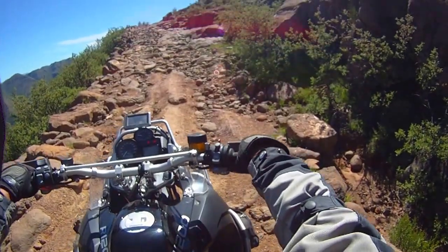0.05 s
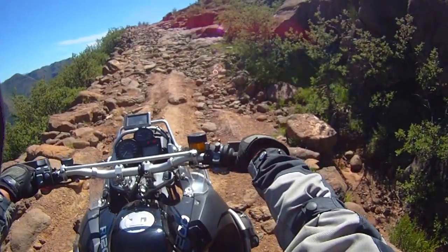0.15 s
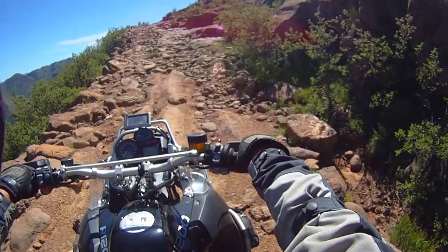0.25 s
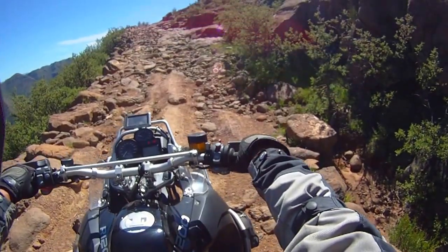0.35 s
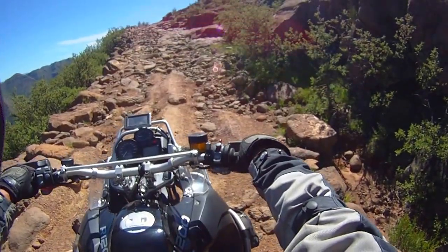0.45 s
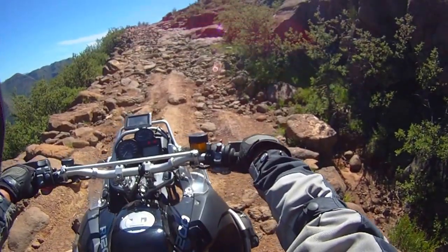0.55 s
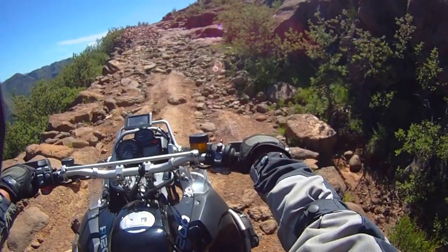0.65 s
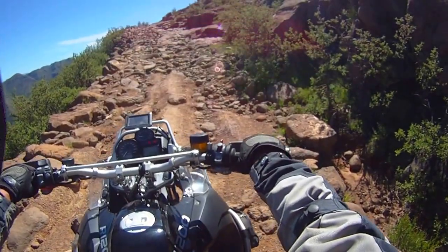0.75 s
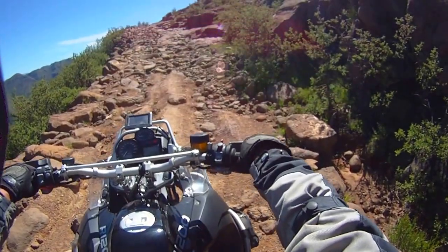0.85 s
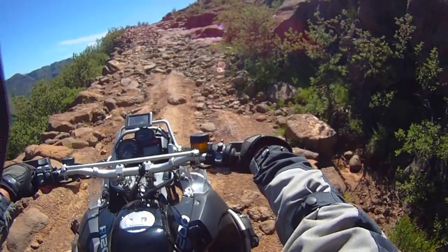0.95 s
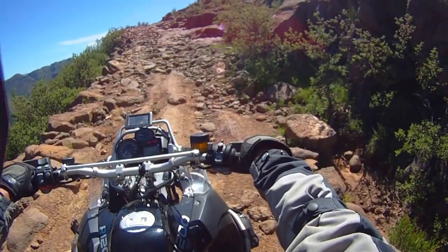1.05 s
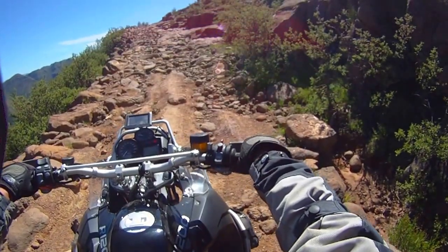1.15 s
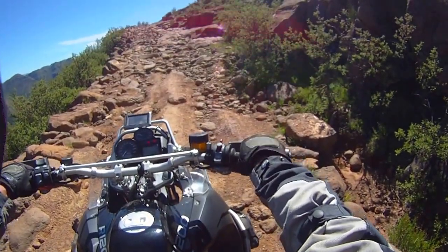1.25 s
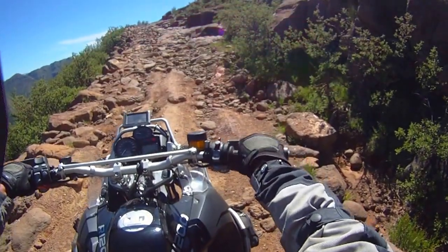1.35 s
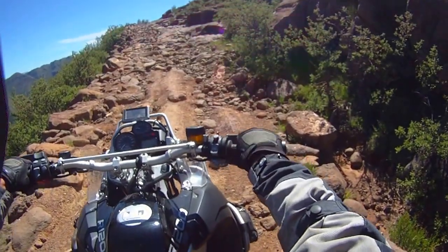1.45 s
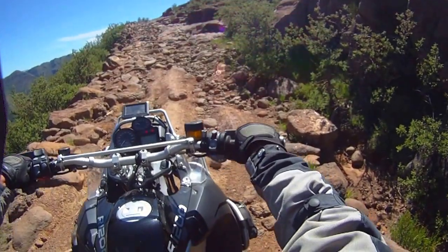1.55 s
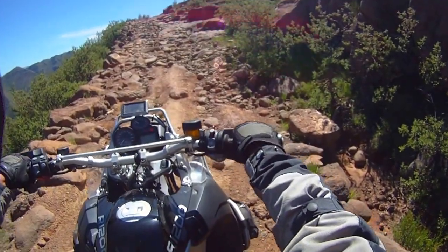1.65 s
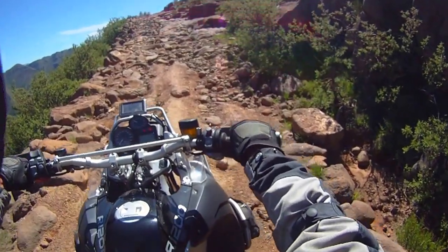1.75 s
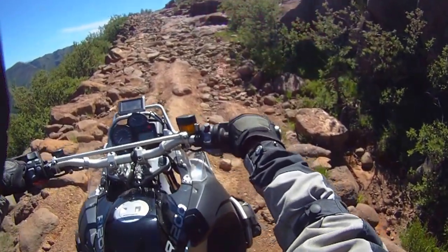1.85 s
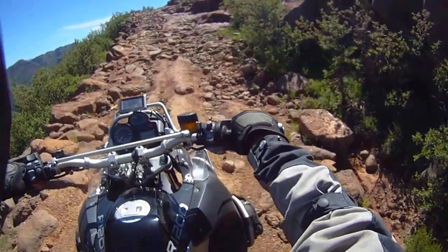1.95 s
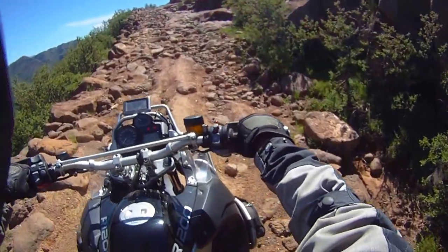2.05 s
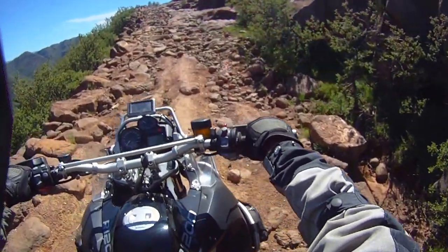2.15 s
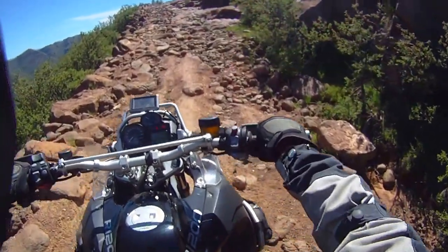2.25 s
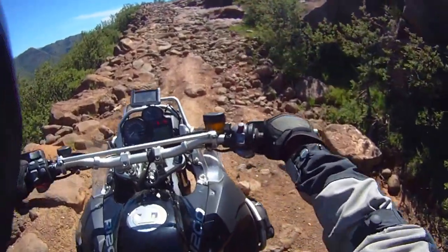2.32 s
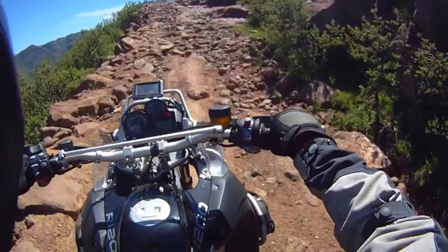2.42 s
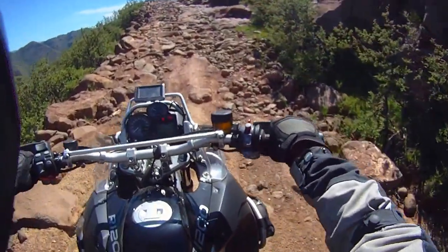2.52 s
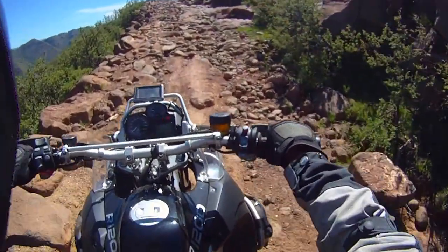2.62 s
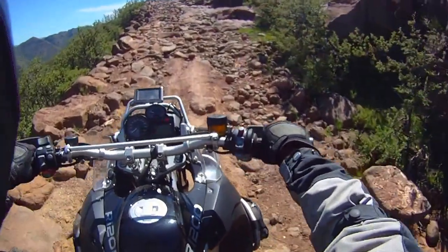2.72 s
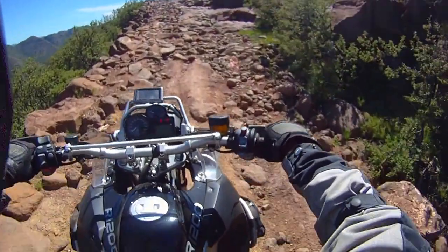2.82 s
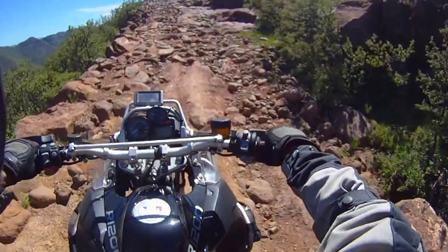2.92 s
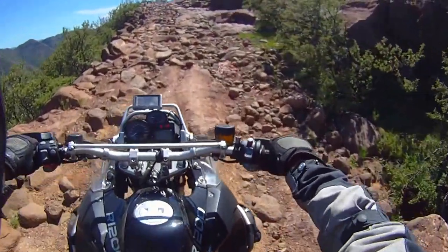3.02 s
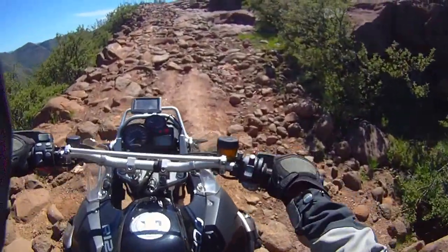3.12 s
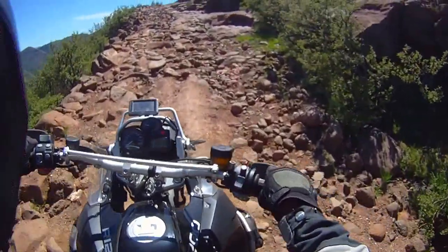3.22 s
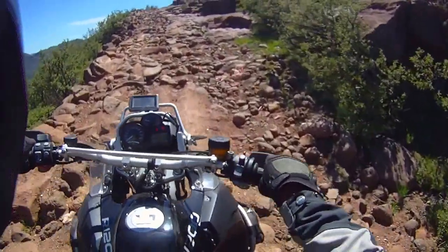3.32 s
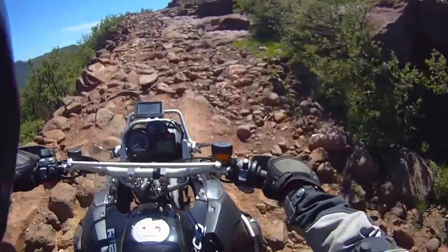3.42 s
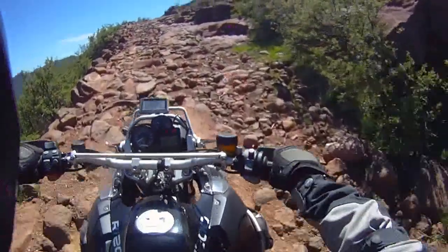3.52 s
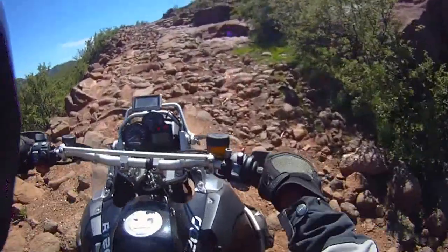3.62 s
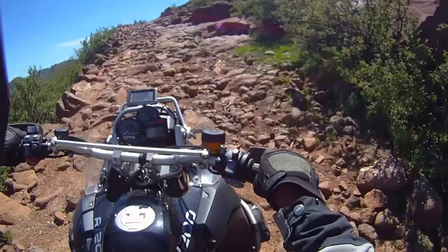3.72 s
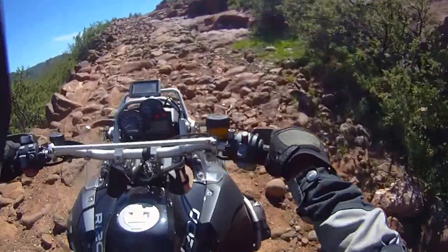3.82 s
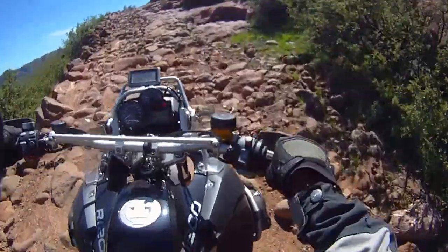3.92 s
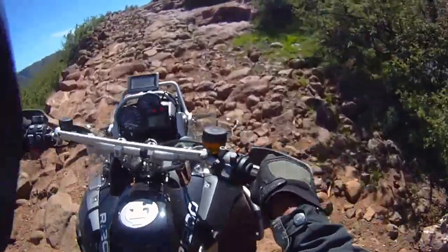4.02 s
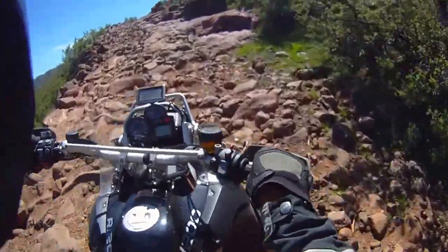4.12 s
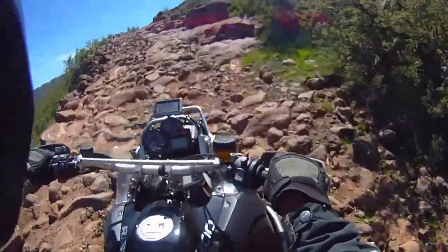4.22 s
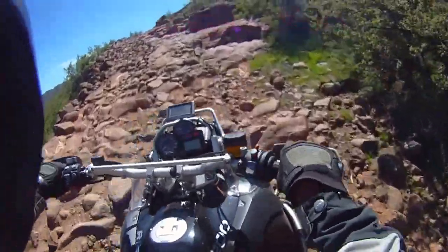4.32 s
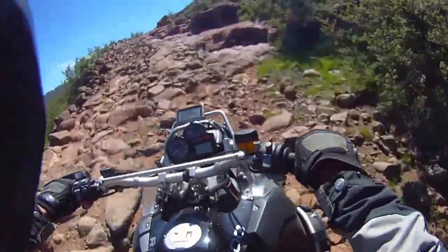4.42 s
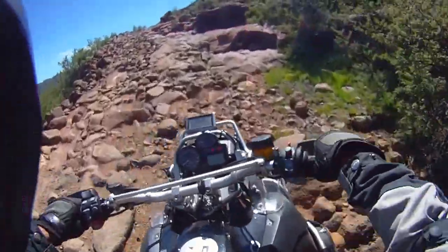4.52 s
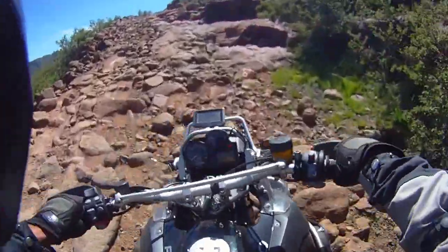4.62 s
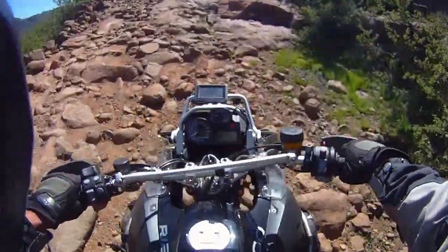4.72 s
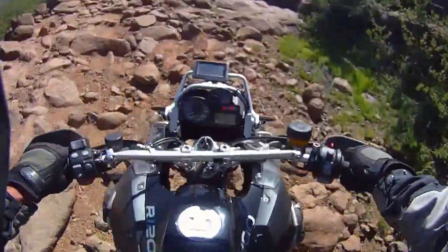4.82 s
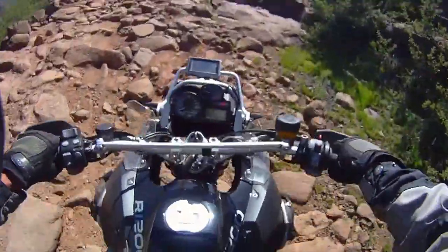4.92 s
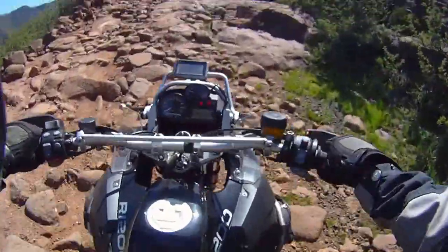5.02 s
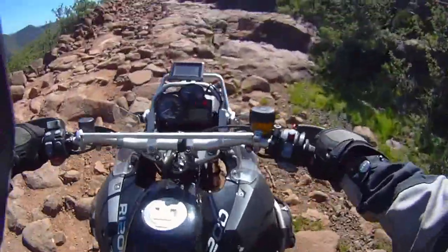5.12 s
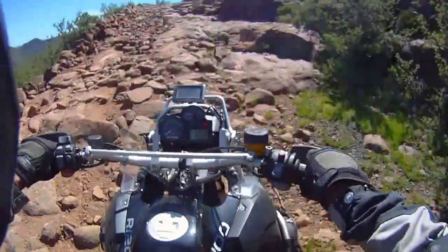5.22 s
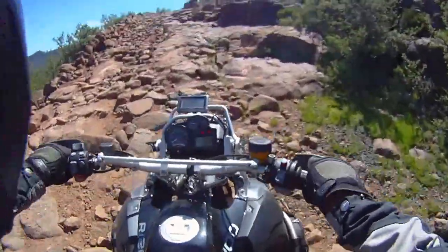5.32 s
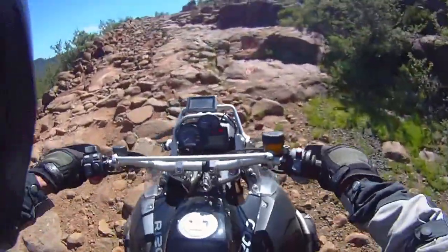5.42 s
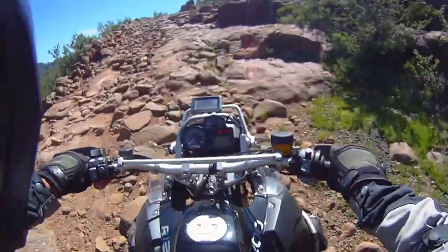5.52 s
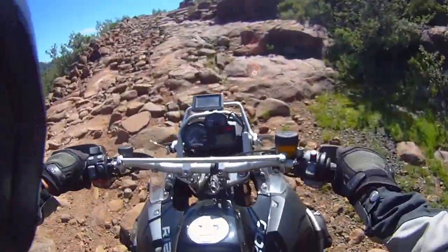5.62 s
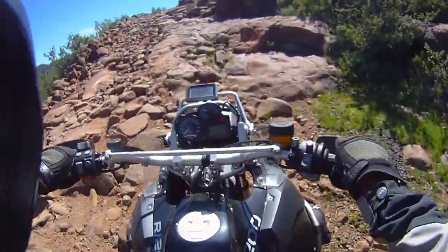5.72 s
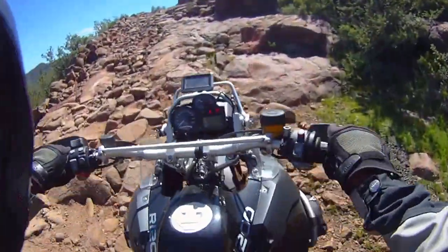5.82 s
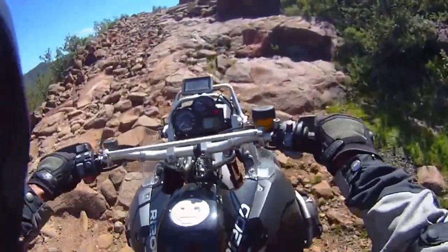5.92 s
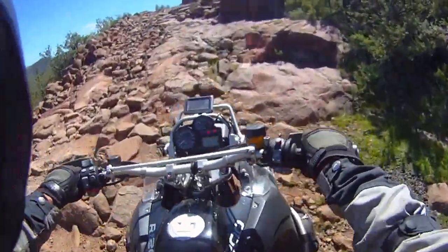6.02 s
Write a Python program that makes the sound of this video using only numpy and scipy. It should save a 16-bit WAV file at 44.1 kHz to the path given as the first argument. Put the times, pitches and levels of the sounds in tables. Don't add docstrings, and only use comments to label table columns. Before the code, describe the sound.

A twin-cylinder motorcycle climbs a rocky track, heard close and boxy through a sealed plastic case on the rider's helmet, in mono. At first the engine runs low with light throttle, sagging near 0.7 s, then giving a brief blip. From about 1.3 s it surges into a strong growling rev, held to about 2.3 s, then falls back. Shorter barks follow around 2.8, 3.2, 3.5 and 4.3 s, with valve clatter, hiss and gear whirr rising and falling alongside. A very faint thin brake squeak passes at 3.4 s. Small rattling jolts grow more frequent. At 4.6 s a lurch and sharp knock overload the input, followed by thuds and plastic chatter until about 4.8 s. The engine drops to lighter running, with more jolts near 5.05 s, then pulls again from 5.3 s, revving up, dipping and roaring loudest at the end near 6 s.

```python
import sys
import numpy as np
from scipy import signal
from scipy.fft import rfft, irfft, next_fast_len
from scipy.io import wavfile
from scipy.ndimage import uniform_filter1d, map_coordinates

SR = 44100
rng = np.random.default_rng(int(sys.argv[2]) if len(sys.argv) > 2 else 0)


def to_linear_factor(level_db):
    exponent = np.asarray(level_db, float) / 20
    return 10 ** exponent


def store_pcm(level_fs):
    pcm = np.round(np.clip(level_fs, -1, 1) * 32767).astype(np.int16)
    wavfile.write(sys.argv[1], SR, np.atleast_2d(pcm).T)


N = 267246

# time_s, firings_hz
FIRING_RATE = [(0.0, 29.11), (0.673, 19.2), (0.953, 37.74), (1.248, 29.85), (1.561, 51.33), (2.036, 51.69),
               (2.664, 24.39), (2.917, 38.9), (3.187, 25.88), (3.519, 32.02), (3.731, 24.28),
               (3.859, 28.28), (4.306, 22.29), (4.564, 37.27), (5.359, 25.59), (5.674, 52.46),
               (5.907, 29.56), (6.1, 51.22)]
# opens_s, full_s, shuts_s, full_pulse_db, shutting_pulse_db
THROTTLE = [(0, .15, 0.28, -63, -67), (0.387, 0.472, 0.6, -67, -62), (0.685, 0.726, 0.93, -51.5, -57),
            (1.074, 1.27, 1.6, -65, -57), (1.21, 1.378, 2.3, -40, -42.5), (2.05, 2.3, 2.826, -43, -41),
            (2.75, 2.85, 3.4, -53.5, -49), (3.013, 3.212, 3.42, -42.5, -43.5),
            (3.4, 3.48, 3.95, -52, -45.5), (3.962, 4.34, 4.57, -44.5, -49), (4.912, 4.984, 4.3, -51, -58),
            (5.0, 5.08, 5.21, -60, -63), (5.22, 5.5, 5.9, -43.5, -45), (5.6, 5.74, 5.86, -49, -44),
            (5.68, 5.964, 6, -36.5, -41.5)]
# time_s, level_db
PACE = [
    (0, -2.5),
    (.7, -3),
    (1.3, -1),
    (2.4, 1.4),
    (3.5, 0.95),
    (4.2, 2),
    (4.6, 4),
    (5.2, .8),
    (6.1, 4.5),
]

# base_db, db_per_firing_hz, db_per_load_db, db_per_pace_db
BOOM_LAW = (-58.5, 0.2071, .7, -.3)
CLATTER_LAW = (-48, 0.3374, 0.15, 0.5)
HISS_LAW = (-50, 0.2547, 0.0549, 0.57)

# pitch_hz, width_hz, level_db
PIPE = [(242, 88, 15), (167, 26, -25)]
# pitch_hz, width_hz, level_db
HEADER = [(352, 63, 0)]
# pitch_hz, width_hz, level_db
AIRBOX = [(598, 125, 2.5), (732, 59, -6)]
# pitch_hz, width_hz, level_db
SILENCER = [(111.7, 15, -1), (59.4, 13, -10.5), (154, 14.4, -10.5)]
# pitch_hz, width_hz, level_db
SHELL = [(1380, 370, 9), (920, 210, -15.5), (2440, 1000, 2)]
# pitch_hz, width_hz, level_db
WHIRR = [(5724, 150, 1), (3114, 39, -1), (2320, 31, 7.5), (8760, 38, -23), (9800, 14, -18),
         (11960, 50, -21), (8000, 91, -2), (4510, 190, -11.5)]
# pitch_hz, width_hz, level_db
JINGLE = [(5740, 660, 0)]
# pitch_hz, width_hz, level_db
BRACKET = [(1824, 140, 0)]

# pitch_hz, level_db (per Hz)
CLATTER = [(210, -42), (350, -12), (463, -2.5), (683, -2), (740, -1), (809, -3), (894, -0.5), (1080, -1.5),
           (1430, 6), (1580, -7), (2050, -20.5), (3180, -19), (3800, -32), (4940, -38), (8360, -120)]
# pitch_hz, level_db (per Hz)
HISS = [(1530, -11.5), (2600, -10), (2850, -11.5), (3070, -8), (3880, -10), (4440, -5), (5050, -4),
        (5880, -1.5), (6430, -7.5), (7600, -13), (8900, -15.5), (10900, -32), (12400, -24.5),
        (14800, -34.5), (15800, -28)]
# pitch_hz, level_db (per Hz)
RUMBLE = [(20, -32), (40, -31), (100, -12), (160, -11.5), (250, -2.5), (340, -7), (450, -20), (700, -7),
          (1200, -120)]
# pitch_hz, level_db (per Hz)
PREAMP = [(3000, -40), (7000, -5), (10000, 4), (15800, -4)]

# start_s, peak_db, low_body_db, tick_db
JOLTS = [(1.415, -23.5, -27, -30), (2.588, -29, -18, -30), (2.625, -29, -20, -30), (2.736, -26, -31, -32),
         (3.234, -30, -29, -30), (3.412, -34, -21, -6), (3.426, -26.5, -17, -8), (3.563, -30.5, -28, -5),
         (3.755, -32, -11, 3), (4.202, -28, -5, -4.5), (4.209, -31, -7, -17), (4.306, -32, -23, -17),
         (4.4, -42, -17, -5), (4.595, -18.5, -8, -14), (4.986, -32, -2, -15), (5.048, -28, 3, 2),
         (5.057, -24.5, -11, -24), (5.073, -31, -18, -12), (5.115, -36, -5, 0.5), (5.346, -43, -21, -11),
         (5.528, -23.5, -4, -3), (5.545, -34, -13, -10), (5.7, -33.5, 4, -16), (5.954, -31, -10, -18)]
# start_s, peak_db, low_body_db, tick_db
CHATTER = [
    (4.611, -26, -25, -21),
    (4.616, -15.5, -10, -16),
    (4.642, -27, 6.5, -26),
    (4.66, -25, -27, -23),
    (4.679, -24.5, -12, -31),
    (4.706, -27, 0.5, -33),
    (4.715, -31.5, -3, -22),
    (4.744, -34, -6, -18),
    (4.764, -34, -10, -17),
]
# start_s, pitch_hz, level_db, push_s, decay_s (to -60 dB)
RAP = [
    (4.6362, 1390, .1, .0022, .006),
]
# start_s, pitch_hz, level_db, length_s
SHOVE = [
    (4.58, 33, -47, .11),
]
# start_s, pitch_hz, level_db, length_s
SQUEAK = [
    (3.36, 10980, -72, .075),
]


def engine():
    flywheel_s = .14
    speed = uniform_filter1d(curves(FIRING_RATE)[0], size=round(flywheel_s * SR), mode="nearest")
    turns = -.1418 + np.cumsum(speed) / SR
    pulse_db, pace_db = load(), curves(PACE)[0]
    gases = exhaust_and_intake(turns, speed, pulse_db, pace_db)
    return gases + bark(turns, speed, pulse_db) + machinery(turns, speed, pulse_db, pace_db)


def exhaust_and_intake(turns, speed, pulse_db, pace_db):
    firing = swell(strokes(turns, scatter_db=.7), peak_s=.00018)
    puff = filtered(firing, pressure_sweep)
    blast = filtered(firing, lambda hz: pressure_sweep(hz) * pipe_echoes(hz))
    pipe = to_linear_factor(pulse_db - 4.5) * steady(resonant(blast, PIPE))

    header_drift_db, intake_drift_db = 2.2 * wobble(3), .6 * wobble(3)
    header_db = pulse_db - 17.0 + 1.9 * pace_db + header_drift_db
    header = to_linear_factor(header_db) * steady(resonant(puff, HEADER))
    revs_db = .42 * (speed - 44)
    intake = to_linear_factor(pulse_db - 5.5 + revs_db + intake_drift_db) * steady(twice(blast, AIRBOX))

    boom_db = follows(BOOM_LAW, speed, np.minimum(pulse_db, -53), pace_db)
    boom = to_linear_factor(boom_db + 0.5) * steady(resonant(puff, SILENCER))
    return intake - (pipe + header + boom)


def pressure_sweep(hz):
    return np.exp(2j * np.pi * (.0035 * hz - 3.6e-6 * hz * hz))


def pipe_echoes(hz):
    return 1 + .38 * np.exp(-2j * np.pi * hz * .004) + .2 * np.exp(-2j * np.pi * hz * .008)


def bark(turns, speed, pulse_db):
    gate = delayed(swell(strokes(turns, scatter_db=1.8), peak_s=0.0018), 0.0008)
    in_shell = resonant(gate * rng.standard_normal(N), SHELL)
    shaking = resonant(in_shell, [(1384, 68, 9), (890, 1100, -8.0)])
    return to_linear_factor(pulse_db - 1.65 - 0.093 * (speed - 14.5)) * steady(shaking)


def machinery(turns, speed, pulse_db, pace_db):
    clatter_db = follows(CLATTER_LAW, speed, pulse_db, pace_db)
    hiss_db = follows(HISS_LAW, speed, pulse_db, pace_db)
    ticks = unit(swell(strokes(5 * turns + .6 * wobble(40), scatter_db=3.5), peak_s=.0022))

    knocks = (1.04 + 0.51 * ticks) * to_linear_factor(1.1 * wobble(9.9)) * rng.standard_normal(N)
    knocks = unit(coloured(knocks, CLATTER))
    clatter = knocks + 0.19 * unit(resonant(knocks, [(1422, 17, 37), (1383, 9.1, 3.8)]))

    fizz = (1.0 + 0.45 * ticks) * to_linear_factor(0.25 * wobble(23)) * rng.standard_normal(N)
    fizz = unit(coloured(fizz, HISS))
    whirr = unit(twice(fizz, WHIRR[:1]) + resonant(fizz, WHIRR[1:]))
    hiss = fizz + 0.3 * to_linear_factor(0.02 * (speed - 49)) * whirr

    jingle_db = hiss_db - 11.0 + 2.55 * pace_db
    bracket_db = clatter_db - 20 + 1.8 * pace_db - 0.21 * (speed - 36)
    rumble_db = 0.57 * hiss_db - 33.5 - .3 * pace_db
    rumble = to_linear_factor(1.5 * wobble(9)) * rng.standard_normal(N)

    noise = to_linear_factor(clatter_db + 0.5) * steady(clatter)
    noise += to_linear_factor(hiss_db - 0.28) * steady(hiss)
    noise += to_linear_factor(jingle_db) * loose(JINGLE, rate=200, patchy_db=5.5)
    noise += to_linear_factor(bracket_db) * loose(BRACKET, rate=41, patchy_db=3.5)
    return noise + to_linear_factor(rumble_db) * unit(coloured(rumble, RUMBLE))


def load():
    t = np.arange(N) / SR
    shut_db, dying_db_per_s = -70, 128
    level_db = np.full(N, float(shut_db))
    for opens, full, shuts, full_db, last_db in THROTTLE:
        held_db = np.interp(t, [opens, full, max(shuts, full + .001)], [shut_db, full_db, last_db])
        twist_db = held_db - dying_db_per_s * np.maximum(t - shuts, 0)
        level_db = np.maximum(level_db, twist_db)
    return level_db


def follows(law, speed, load_db, pace_db):
    base_db, per_hz, per_load, per_pace = law
    cruise_hz, half_load_db = 30, -55
    return base_db + per_hz * (speed - cruise_hz) + per_load * (load_db - half_load_db) + per_pace * pace_db


def loose(modes, rate, patchy_db):
    grains = to_linear_factor(patchy_db * wobble(rate)) * rng.standard_normal(N)
    return unit(twice(grains, modes))


def mount():
    out, t = np.zeros(N + SR), np.arange(SR // 8) / SR
    rows = [(*row, -11, .6) for row in JOLTS] + [(*row, -7, 0.11) for row in CHATTER]
    onset = 1 - np.exp(-t / 0.00086)
    blow = 1 + 0.94 * to_linear_factor(-60 * t / 0.0028)
    shape = to_linear_factor(-60 * t / 0.051) * blow * onset
    for start_s, peak_db, low_db, tick_db, upper_db, share in rows:
        rattle = shape * rng.standard_normal((4, len(t)))
        ring = twice(rattle[0], SHELL[:2])
        low = twice(rattle[1], [(1026, 245, -1), (580, 320, -4.5)])
        upper = twice(rattle[2], [(2400, 1000, 0)])
        tick = twice(rattle[3] * to_linear_factor(-60 * t / .045), [(5600, 2000, 0), (3000, 1200, -7)])
        parts = (-1.5, ring), (low_db, low), (upper_db + share * tick_db, upper), (tick_db - 3.0, tick)
        jolt = sum(to_linear_factor(db) * x / np.abs(x).max() for db, x in parts)
        out[round(start_s * SR):][:len(t)] += to_linear_factor(peak_db) * jolt
    return out[:N]


def rap():
    start_s, hz, db, push_s, decay_s = RAP[0]
    t = np.maximum(np.arange(N) / SR - start_s, 0)
    after = np.maximum(t - push_s, 0)
    fade = np.where(t < push_s, 1 - np.exp(-t / .0004), to_linear_factor(-60 * (t - push_s) / decay_s))
    wall = -to_linear_factor(db) * fade * np.sin(2 * np.pi * hz * t)
    beating = to_linear_factor(-17.0) * np.sin(2 * np.pi * 1540 * after) + to_linear_factor(-34) * np.sin(2 * np.pi * 1180 * after)
    wall += to_linear_factor(-60 * after / 0.037) * beating
    crack_colour = [(1200, -23), (2200, -0.5), (4000, -9), (7500, -6), (15000, -20)]  # pitch_hz, level_db
    crack = to_linear_factor(-23.0) * fade ** 2 * unit(coloured(rng.standard_normal(N), crack_colour))
    return wall + crack


def burst(start_s, hz, db, length_s):
    u = np.clip((np.arange(N) / SR - start_s) / length_s, 0, 1)
    return to_linear_factor(db) * np.sin(np.pi * u) ** 2 * np.sin(2 * np.pi * hz * length_s * u)


def input_hiss():
    return to_linear_factor(-77) * unit(coloured(rng.standard_normal(N), PREAMP))


def strokes(turns, scatter_db):
    at = np.flatnonzero(np.diff(np.floor(turns)) > 0)
    x = np.zeros(N)
    x[at] = to_linear_factor(scatter_db * rng.standard_normal(len(at)))
    return x


def swell(x, peak_s):
    u = np.arange(SR // 20) / SR / peak_s
    return signal.fftconvolve(x, (u * np.exp(1 - u)) ** 2)[:N]


def delayed(x, s):
    return np.pad(x, (round(s * SR), 0))[:N]


def resonant(x, modes):
    def response(f):
        total = 0
        for k, (hz, width, db) in enumerate(modes):
            total = total + (-1) ** k * to_linear_factor(db) * 1j * f * width / (hz * hz - f * f + 1j * f * width)
        return total
    return filtered(x, response)


def twice(x, modes):
    return resonant(resonant(x, modes), modes)


def coloured(x, points):
    hz, db = np.transpose(points)
    return filtered(x, lambda f: to_linear_factor(np.interp(np.log(f + 1), np.log(hz + 1), db)))


def filtered(x, response):
    m = next_fast_len(len(x) + 8192)
    return irfft(rfft(x, m) * response(np.fft.rfftfreq(m, 1 / SR)), m)[:len(x)]


def steady(x):
    return x / np.sqrt(np.abs(uniform_filter1d(x ** 2, size=SR // 6)) + 1e-12)


def unit(x):
    return x / np.sqrt(np.mean(x ** 2) + 1e-20)


def curves(rows):
    s, *cols = np.transpose(rows)
    return [np.interp(np.arange(N) / SR, s, c) for c in cols]


def wobble(rate):
    knots = rng.standard_normal(int(N * rate / SR) + 4)
    return map_coordinates(knots, [np.arange(N) * rate / SR])


def scene():
    return (engine() + mount() + rap() + burst(*SHOVE[0]) + burst(*SQUEAK[0]))[None]


def low_pass(x):
    return signal.sosfilt(signal.butter(12, 16400, fs=SR, output="sos"), x)


def record(dry):
    x = dry + input_hiss()
    x = x / (1 + np.abs(x) ** 14) ** (1 / 14)
    mix = filtered(x[0], lambda hz: hz < 15300)[None]
    return low_pass(mix)


dry = scene()
out = record(dry)
store_pcm(out)
```